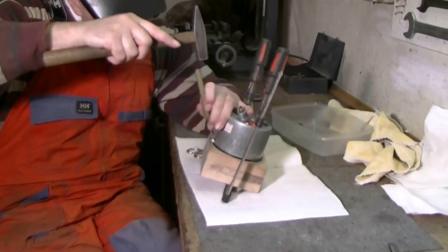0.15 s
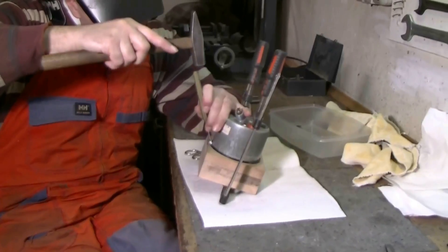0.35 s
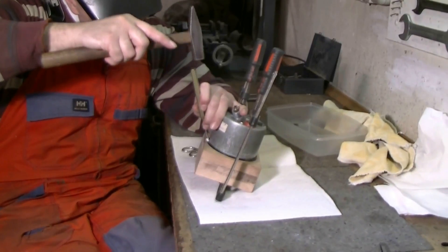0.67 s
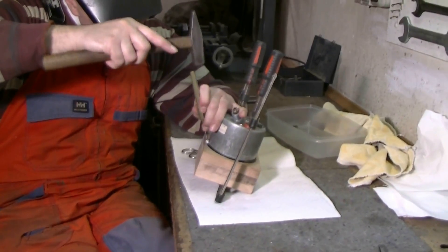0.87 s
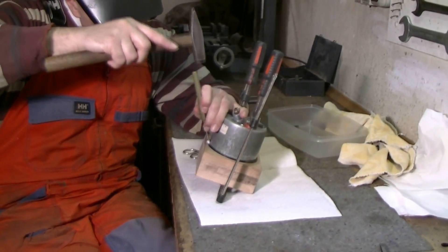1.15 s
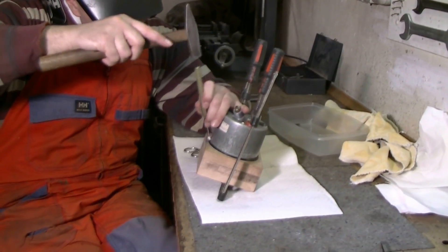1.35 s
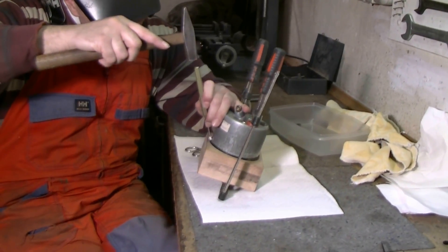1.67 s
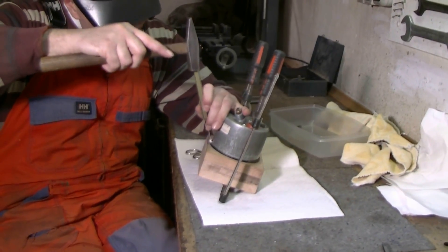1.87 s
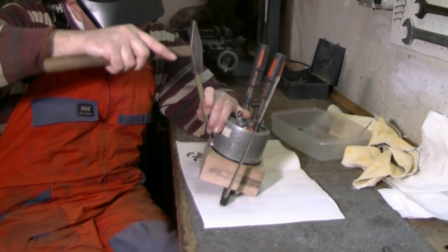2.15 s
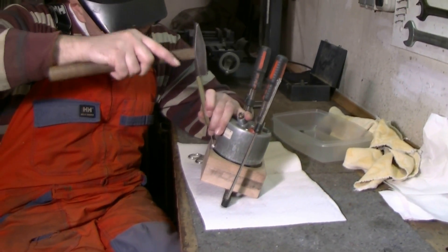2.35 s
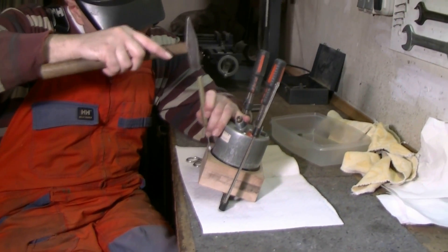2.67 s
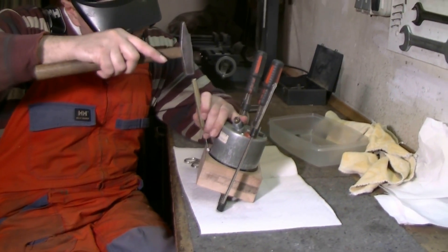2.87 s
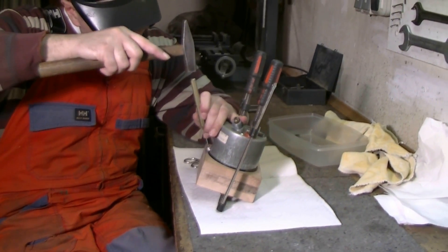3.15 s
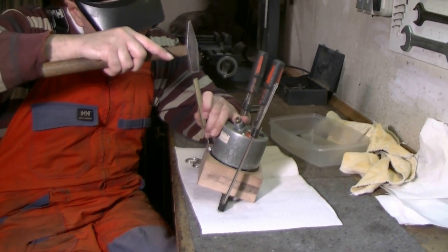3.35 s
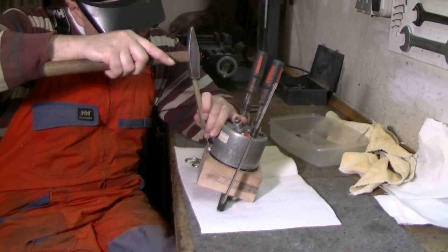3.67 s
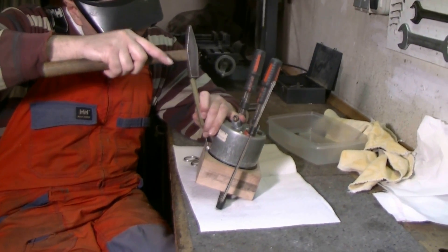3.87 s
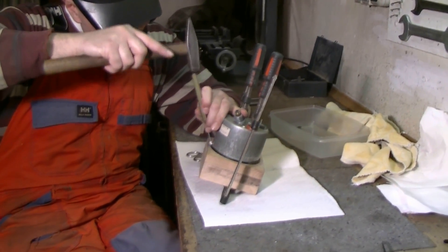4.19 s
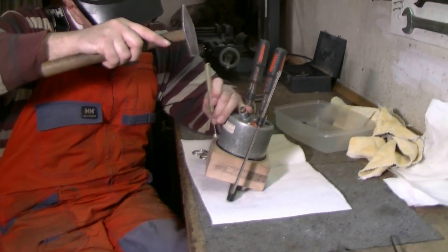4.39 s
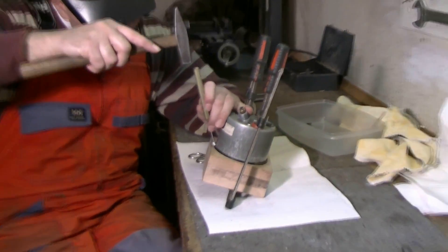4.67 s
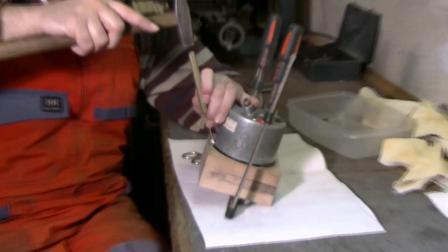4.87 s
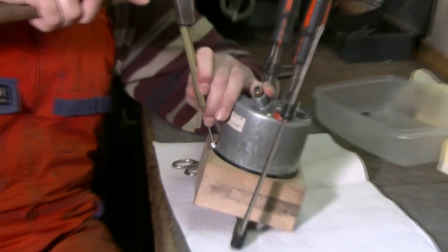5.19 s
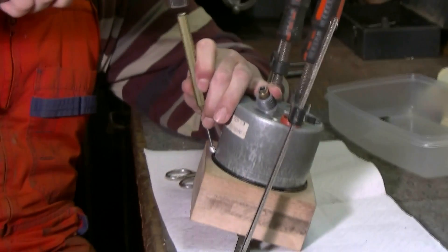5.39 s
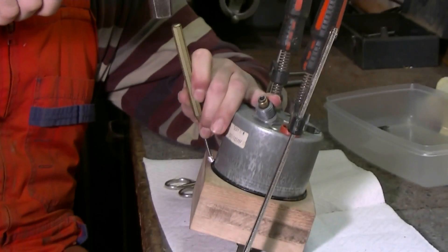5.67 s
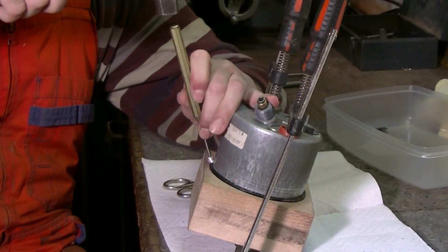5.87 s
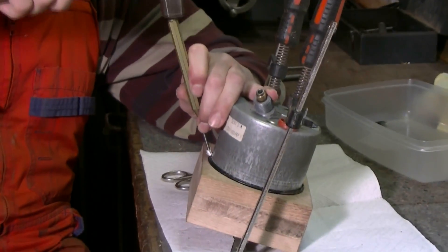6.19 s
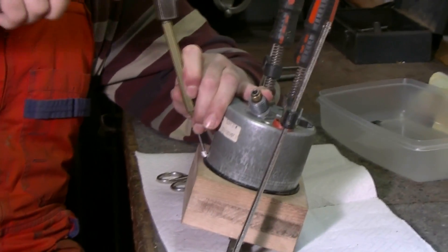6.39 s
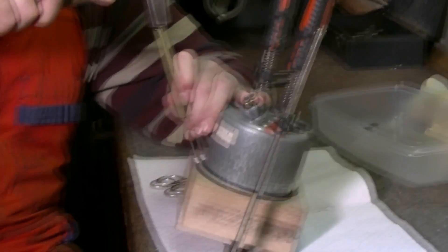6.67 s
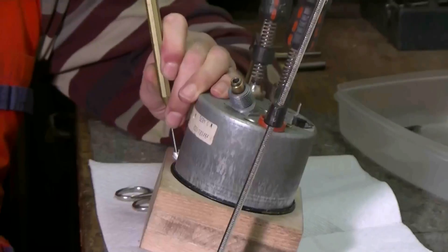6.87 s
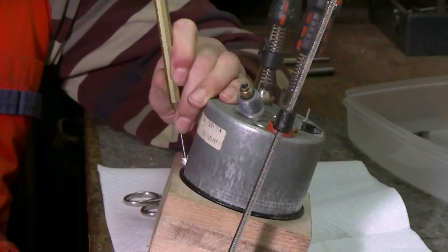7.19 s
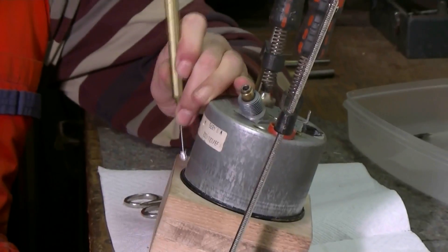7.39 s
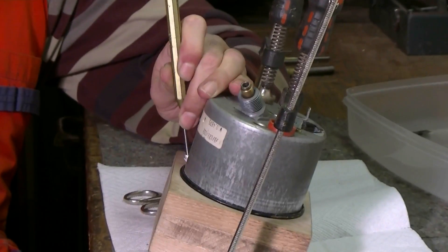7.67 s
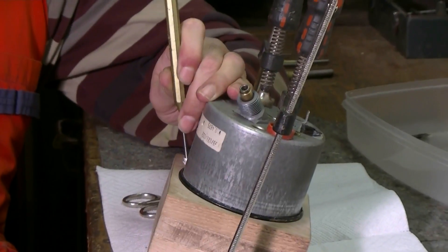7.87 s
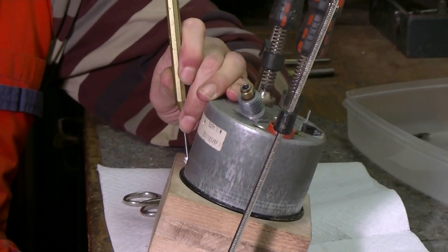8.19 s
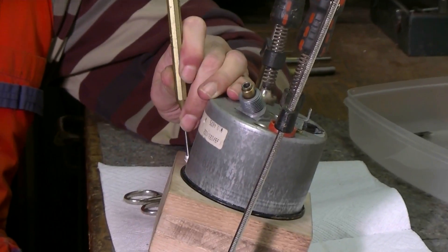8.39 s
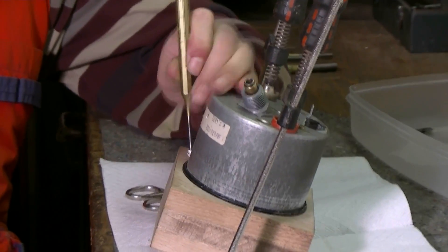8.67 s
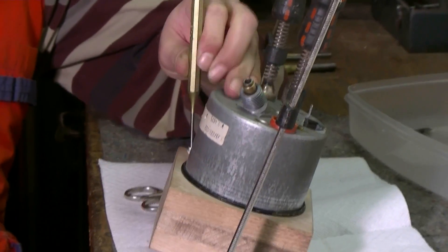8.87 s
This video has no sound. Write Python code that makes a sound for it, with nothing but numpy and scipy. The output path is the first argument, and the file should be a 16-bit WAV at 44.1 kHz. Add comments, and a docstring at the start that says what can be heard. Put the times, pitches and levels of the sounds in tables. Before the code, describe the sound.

A small hammer taps a brass punch against the thin rim of a metal can, heard close in a small hard workshop. Each blow is a sharp crack with a brief metallic ring and a low boom through the bench. Groups of three, each growing stronger, fall at about 0.4 to 0.8, 1.7 to 2.2 and 3.5 to 4 seconds. Light ticks of the punch follow, then two blows around 5 seconds and three from 6 to 6.4. At 6.6 the punch rattles, and a short click comes as the sound drops out for a tenth of a second. Five duller, boomier blows follow, two near 6.8 and 7 seconds and three from 7.9 to 8.3. A soft knock comes near 8.8. Underneath are quiet room tone and the very faint whine and tick of lens motors, with a zoom whir from 4.4 to 5.5 seconds.

```python
"""Room tone and the whine and tick of a camera's lens motors in a small hard workshop. From 0.35 s a small
hammer taps a brass punch against the thin rim of a metal can clamped on a bench, in groups of two to five.
Each blow cracks, rings punch, can and hammer head, then booms through the bench. The lens zooms from
4.4 to 5.5 s. Near 6.6 s the punch rattles; just after, a short click comes as the sound cuts off briefly.
The five later blows sound duller, with less can ring and more low boom."""
import sys
import numpy as np
from scipy import signal
from scipy.fft import rfft, irfft
from scipy.io import wavfile
from scipy.ndimage import uniform_filter1d

SR = 44100
rng = np.random.default_rng(int(sys.argv[2]) if len(sys.argv) > 2 else 0)


def wrap_up_sound(samples):
    """Save the sound to the file named by the first command line argument, as 16-bit audio."""
    columns = np.atleast_2d(samples).T
    # keep every value between -1 and 1, then stretch to whole-number steps
    tamed = np.clip(columns, -1, 1)
    steps = np.round(tamed * 32767).astype(np.int16)
    wavfile.write(sys.argv[1], SR, steps)


N = 398529

# modes of bench, wooden block and can (frequency [Hz], level [dB], t60 [s])
BENCH_MODES = [(60, -16, 0.38), (80.54, -7.5, 0.37), (105.4, 3.5, 0.21), (110, -20, 0.95), (142.2, 0, 0.26),
               (168.7, -7.5, 0.43), (195.8, -0.5, 0.21), (228.7, -1.5, 0.15), (248.8, -3.5, .22)]
BLOCK_MODES = [(294.5, -5.5, 0.46), (322.7, -2, 0.31), (345, -2, 0.35), (377.4, -1.5, 0.17),
               (438, -7.5, 0.21), (515, -10, 0.16)]
CAN_MODES = [(626, -10.5, 0.058), (753, -10.5, 0.073), (852, 1.5, 0.042), (1005, -12, .025),
             (1141.5, -1.5, 0.036), (1207, -2, 0.053), (1337, -4, 0.03), (1490, -11, .025)]
# opening silence and dropout (start [s], end [s])
SILENCES = [(0, 0.018), (6.609, 6.697)]
DROPOUT_S = SILENCES[1][0]


def gain_of(db):
    """Decibels to amplitude."""
    return 10 ** (np.asarray(db) / 20)


def unit_rms(x):
    """Scales to rms 1."""
    return x / np.sqrt(np.mean(x ** 2) + 1e-20)


def curve_at(points, hz):
    """Interpolates on a log-frequency axis."""
    point_hz, value = np.transpose(points)
    return np.interp(np.log(hz + 1), np.log(point_hz + 1), value)


def add(mix, start_s, sound):
    """Mixes a sound in at start_s."""
    part = mix[round(start_s * SR):][:len(sound)]
    part += sound[:len(part)]


def coloured(x, points):
    """Filters by a curve of (frequency [Hz], gain [dB])."""
    size = x.shape[-1]
    hz = np.fft.rfftfreq(size, 1 / SR)
    return irfft(rfft(x) * gain_of(curve_at(points, hz)), size)


def minimum_phase(db):
    """Causal impulse response from gains on 1025 bins."""
    log_gain = np.log(gain_of(np.r_[db, db[-2:0:-1]]))
    spectrum = np.exp(np.conj(signal.hilbert(log_gain)))
    return np.fft.ifft(spectrum).real[:1024]


def noise_bands(peaks):
    """Steady noise in bell-shaped bands."""
    hz = np.fft.rfftfreq(N, 1 / SR)
    power = 0
    for centre_hz, width_hz, db in peaks:
        bell = 2 / np.pi * width_hz / (width_hz ** 2 + 4 * (hz - centre_hz) ** 2)
        skirt = 1 + ((hz - centre_hz) / (3 * width_hz)) ** 4
        power += gain_of(2 * db) * bell / skirt
    return irfft(rfft(rng.standard_normal(N)) * np.sqrt(power * SR / 2), N)


def ring(modes, rise_s, scatter_db=0, detune=0, hold_s=1e-9):
    """Decaying sines; each blow lands differently, so level, pitch and phase can vary."""
    hz, db, t60_s = np.transpose(modes)[:, :, None]
    level_draw, pitch_draw, phase = rng.standard_normal((3, len(modes), 1))
    t = np.arange(0, t60_s.max() + hold_s, 1 / SR)
    age_s = np.sqrt(t ** 2 + hold_s ** 2) - hold_s
    envelopes = gain_of(db + scatter_db * level_draw - 60 * age_s / t60_s)
    sines = np.sin(2 * np.pi * (hz * (1 + detune * pitch_draw) * t + phase))
    return (envelopes * sines).sum(0) * (1 - np.exp(-t / rise_s))


def room_tone():
    """Noise and faint hum, mid and side; the mid is 2.5 dB louder after the dropout."""
    # noise spectrum (frequency [Hz], relative density [dB])
    spectrum = [(29, -52.5), (50, -12), (96, -1.5), (439, -9.5), (495, -9), (559, -9), (661, -1.5),
                (729, -10.5), (822, -7), (1620, -12.5), (5270, -17), (6240, -19), (16000, -29.5)]
    # hum bands (centre [Hz], width [Hz], level [dB])
    hum = [(108, 50, -78), (193, 30, -78), (404, 5, -79), (656, 56, -82), (821, 15, -76.5), (1154, 51, -81),
           (2160, 80, -88)]
    tone = gain_of(-67.5) * unit_rms(coloured(rng.standard_normal((2, N)), spectrum))
    tone += [noise_bands(hum), noise_bands(hum)]
    tone[0] *= gain_of(2.5 * (np.arange(N) / SR > DROPOUT_S))
    return tone


def focus_steps(period_s=.04, pip_hz=3200):
    """The focus drive steps with uneven force, half a period later after the dropout."""
    step_s = np.arange(.0055, N / SR - period_s, period_s)
    step_s += (step_s > DROPOUT_S) * period_s / 2
    steps = np.zeros(N)
    steps[(step_s * SR).astype(int)] = gain_of(2.8 * rng.standard_normal(len(step_s)))
    pip = np.sin(2 * np.pi * pip_hz * np.arange(260) / SR) * np.hanning(260)
    return signal.oaconvolve(steps, pip)[:N]


def lens_motors(zoom_span_s=(4.4, 5.5), ramp_s=.22):
    """The focus motor whines and ticks, the zoom motor runs once; mid and side."""
    # focus drive (time [s], whine gain [dB], tick gain [dB])
    drive = [(0, -88, -90), (.2, -79, -68), (1.1, -78.5, -63.5), (1.7, -78.5, -66), (2.5, -88.5, -78.5),
             (2.9, -91, -86), (3.3, -82, -80), (4.3, -80.5, -82.5), (4.6, -80, -93), (5.4, -84, -85),
             (5.7, -75.5, -76), (6, -81, -86), (6.6, -74, -72), (7.299, -74, -59.5), (7.85, -80.5, -58.5),
             (8.6, -77, -78), (9.04, -77, -66)]
    # motor whines (centre [Hz], width [Hz], relative level [dB])
    wide_bands = [(6000, 320, 0.0042)]
    focus_bands = [(4800, 250, -9.5), (6420, 300, 1)]
    zoom_bands = [(3290, 120, -2), (3980, 230, 2), (5070, 150, 0.5), (8500, 280, -1.5)]
    t = np.arange(N) / SR
    drive_s, *levels = np.transpose(drive)
    whine_db, tick_db = (np.interp(t, drive_s, db) for db in levels)
    started, stopped = (np.clip((t - s) / ramp_s + .5, 0, 1) for s in zoom_span_s)
    wide_db = whine_db - 10.5 * started  # this band fades on zooming in
    zoom_gain = gain_of(-77.5) * (started - stopped) ** 2
    flutter = gain_of(1.6 * unit_rms(uniform_filter1d(rng.standard_normal(N), size=1200)))
    motors = np.zeros((2, N))
    for channel in motors:
        whine = gain_of(wide_db) * noise_bands(wide_bands) + gain_of(whine_db) * noise_bands(focus_bands)
        channel += flutter * whine + zoom_gain * noise_bands(zoom_bands)
    motors[0] += gain_of(tick_db) * focus_steps()
    return motors


def background():
    """Room tone and lens motors; mid and a weaker side."""
    # stereo width (frequency [Hz], side gain [dB])
    width = [(60, -15.5), (180, -12), (550, -7), (1650, -7.5), (4970, -13.5), (15000, -18.5)]
    mid, side = room_tone() + lens_motors()
    return np.array([mid, coloured(side, width)])


def workshop_reverb(x, build_s=.014):
    """Sparse reflections, each band dying at its own rate; mid and a weaker, unrelated side."""
    # room decay (frequency [Hz], t60 [s])
    decay = [(60, 0.94), (160, 0.51), (420, 0.46), (1100, 0.32), (2910, 0.31), (7680, 0.25)]
    # colour of the tail, and further colour of its side (frequency [Hz], gain [dB])
    tail_colour = [(60, 1.5), (300, 4), (600, -0.5), (1000, -0.5), (3000, -4), (8000, -4), (12300, -9.5),
                   (13500, -23)]
    side_colour = [(60, -20.5), (130, -30.5), (290, -18), (640, -18.5), (1410, -17.5), (3100, -11.5),
                   (6820, -10.5), (15000, -16)]
    slots = np.arange(100, SR - 12, 12)
    arrivals = slots + rng.integers(0, 12, (2, len(slots)))
    taps = np.zeros((2, SR))
    np.put_along_axis(taps, arrivals, rng.choice([-1., 1.], arrivals.shape), 1)
    taps *= 1 - np.exp(-np.arange(SR) / SR / build_s)
    hz, t, spectra = signal.stft(taps, SR, nperseg=256)
    spectra *= gain_of(-60 * t / curve_at(decay, hz)[:, None])
    tail = signal.istft(spectra, SR, nperseg=256)[1][:, :SR]
    tail = coloured(tail / np.linalg.norm(tail[0]), tail_colour)
    tail[1] = coloured(tail[1], side_colour) * gain_of(-3)
    return signal.fftconvolve(x[None], tail, axes=1)[:, :N]


def bench_knocks():
    """Soft knocks ring bench and block; the can answers more softly."""
    # knocks (time [s], gain [dB])
    knocks = [(1.273, -59.5), (2.973, -66), (8.838, -49)]
    out = np.zeros(N)
    for s, db in knocks:
        add(out, s, gain_of(db) * ring(BENCH_MODES + BLOCK_MODES, .008, scatter_db=3.4, detune=.0095))
        add(out, s, gain_of(db - 3) * ring(CAN_MODES, .0037, scatter_db=3, detune=.004))
    return out


def small_ticks(rise_s=.00046, t60_s=.012):
    """Each tick is a puff of noise around one short resonance."""
    # punch slips and touches, plus a click at 6.607 s as the sound cuts off
    # (time [s], level [dB], pitch [Hz])
    ticks = [(0.97, -36, 3870), (4.168, -52, 7200), (4.202, -51, 7500), (4.216, -41.5, 3000),
             (4.2622, -31, 3940), (4.272, -57, 7500), (4.347, -33, 2620), (4.635, -47, 760),
             (4.75, -42, 755), (5.304, -52, 7000), (5.413, -47, 3880), (5.564, -45, 1700),
             (6.356, -44, 6040), (6.558, -16, 3340), (6.565, -22, 3430), (6.578, -26.5, 3710),
             (6.589, -24.5, 2760), (6.597, -29.5, 4100), (6.607, -22, 2560), (8.585, -57, 6500),
             (8.613, -36.5, 8640)]
    out, t = np.zeros(N), np.arange(4096) / SR
    for s, db, hz in ticks:
        noise_share = hz / (hz + 3200)  # higher ticks are noisier
        around_pitch = [(hz / 8, -22), (hz, 0), (hz * 2.2, -8), (hz * 3.3, -30)]
        puff = unit_rms(coloured(rng.standard_normal(len(t)), around_pitch))
        puff = coloured(puff, [(9500, 2.5), (14000, -19)])  # little top treble
        tone = np.sin(2 * np.pi * hz * t)
        envelope = gain_of(db - 60 * t / t60_s) * (1 - np.exp(-t / rise_s))
        add(out, s, envelope * (noise_share * puff + (1 - noise_share) * tone))
    return out


def crack(treble_db, chatter_db, chatter_s=.0034, shelf_hz=5200):
    """A first touch, a hard contact 1 ms later, then the punch chatters on the rim; peak 1."""
    # impact spectrum (frequency [Hz], relative density [dB])
    spectrum = [(100, -41.5), (300, -9.5), (600, -10), (1100, -0.5), (1700, -6.5), (2500, -2.5), (3900, -2),
                (4800, -4.5), (5600, -12.5), (7000, -6.5), (8500, -11), (11200, -9.5), (13000, -21.5),
                (15000, -33), (16000, -46.5)]
    hz, t = np.fft.rfftfreq(2048, 1 / SR), np.arange(1024) / SR
    contacts = gain_of(chatter_db) * np.exp(-t / chatter_s) * rng.standard_normal(len(t))
    contacts[:40] *= np.linspace(.3, 1, 40)
    contacts[40] = 1
    # the steel sets the colour, however the contacts fall
    contacts_db = 10 * np.log10(uniform_filter1d(abs(rfft(contacts, 2048)) ** 2, size=24))
    shelf_db = treble_db / (1 + (shelf_hz / (hz + 1)) ** 8)
    burst = np.convolve(contacts, minimum_phase(curve_at(spectrum, hz) - contacts_db + shelf_db))
    return burst / abs(burst).max()


def hammer_blows():
    """Each blow cracks and rings the metal in air, and swells as a boom in bench and block."""
    # blows (time [s], force as crack peak [dB], punch [dB], rim [dB], head [dB], high head mode [dB])
    blows = [(0.35, -18, -32, -14.5, -47.5, -64.5), (0.629, -9.5, -21, -22, -23, -61.5),
             (0.827, -7.5, -20, -30.5, -20, -56), (1.738, -20, -30.5, -32, -40.5, -64),
             (1.992, -5.5, -20.5, -26, -31, -60.5), (2.21, -5, -17.5, -27.5, -30, -46.5),
             (3.489, -16.5, -34.5, -24, -38, -85), (3.76, -8, -20, -20.5, -25, -49),
             (3.97, -5, -20, -18.5, -21.5, -43), (4.848, -14, -24.5, -38, -28.5, -84),
             (5.085, -4.5, -21, -20, -45, -50), (5.995, -11.5, -24, -16, -29.5, -69),
             (6.245, -6, -21.5, -14.5, -22, -57), (6.449, -2, -17.5, -27.5, -23.5, -50),
             (6.766, -1, -27, -39, -19, -59.5), (6.971, 1.5, -20, -46, -19, -53.5),
             (7.878, -7, -24.5, -35.5, -26, -53), (8.116, -1, -22.5, -24, -19, -43.5),
             (8.306, 1, -16, -37, -25, -52.5)]
    # modes of lid, rim, punch and hammer head (frequency [Hz], level [dB], t60 [s])
    lid_modes = [(2102, -1.5, 0.057), (2258, -3, 0.034), (2395, -4.5, 0.051), (2635, -0.5, 0.044)]
    rim_modes = [(4560, -1.6, 0.037), (4586, 0.52, 0.016)]
    punch_modes = [(3148, -9, 0.012), (3470, -5, .02), (3620, -2, 0.027), (3755, 1, 0.029),
                   (3927, -0.5, .018), (4170, -2, 0.027), (5480, -8.5, 0.0089), (6900, -9, 0.022),
                   (7400, -13, 0.028), (8430, -12, 0.022), (11040, -4.5, 0.022), (12100, -12.5, 0.052)]
    head_mode = [(9447, 0, .075)]
    high_head_mode = [(13207, 0, .28)]
    air, bench = np.zeros((2, N))
    for s, force_db, punch_db, rim_db, head_db, high_db in blows:
        after_dropout = s > DROPOUT_S  # duller, less can ring, more low boom
        treble_db = 5 + .55 * force_db - 5.5 * after_dropout
        chatter_db = -14.5 - 1.64 * after_dropout
        lid_db = -19.5 + 1.05 * force_db - after_dropout
        can_db = -24 + .55 * force_db - 5 * after_dropout
        bench_db = -29 + .4 * force_db + .89 * after_dropout
        block_db = -33.5 + .85 * force_db + 2 * after_dropout
        s += .0004
        add(air, s, gain_of(force_db) * crack(treble_db, chatter_db))
        s += .0009  # ringing starts at the hard contact
        add(air, s, gain_of(lid_db) * ring(lid_modes, rise_s=.0013, scatter_db=1, detune=.0035))
        add(air, s, gain_of(can_db) * ring(CAN_MODES, rise_s=.00027, scatter_db=1.5, detune=.0029))
        add(air, s, gain_of(punch_db) * ring(punch_modes, rise_s=.00017, scatter_db=1, detune=.004))
        add(air, s, gain_of(rim_db) * ring(rim_modes, rise_s=.00034, detune=.007))
        add(air, s, gain_of(head_db) * ring(head_mode, rise_s=.00072))
        add(air, s, gain_of(high_db) * ring(high_head_mode, rise_s=.001))
        boom = ring(BENCH_MODES, rise_s=.006, scatter_db=1.4, detune=.011, hold_s=.06)
        block = ring(BLOCK_MODES, rise_s=.006, scatter_db=1, detune=.0045, hold_s=.06)
        add(bench, s, gain_of(bench_db) * boom)
        add(bench, s, gain_of(block_db) * block)
    return air, bench


def scene():
    """Near sounds central, reverb and background in mid and side; returns left and right."""
    air, bench = hammer_blows()
    bench += bench_knocks()
    ticks = small_ticks()
    mid, side = workshop_reverb(air + .096 * bench + .16 * ticks) + background()
    mid += air + bench + ticks
    side -= .03 * air  # blows come from slightly right
    side += .09 * np.gradient(air + ticks)  # the two microphone ports lie a little apart
    return np.array([mid + side, mid - side])


def record(dry, ceiling=.85, cutoff_hz=16300):
    """The input stage rounds the peaks; then the two silences and a low-pass."""
    t = np.arange(N) / SR
    audible = np.prod([(t < start_s) | (t > end_s) for start_s, end_s in SILENCES], axis=0)
    rounded = ceiling * np.tanh(dry / ceiling)
    gated = rounded * uniform_filter1d(audible.astype(float), size=120)
    lowpass = signal.firwin(511, cutoff_hz, window=("kaiser", 9), fs=SR)
    return signal.oaconvolve(gated, lowpass[None], "same")


dry = scene()
out = record(dry)
wrap_up_sound(out)
```